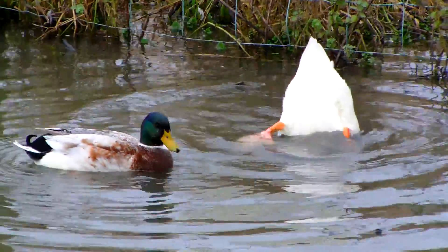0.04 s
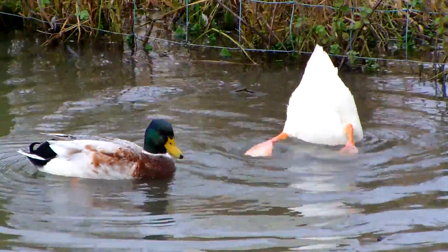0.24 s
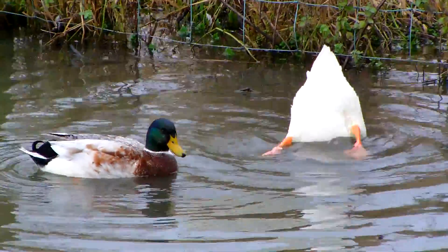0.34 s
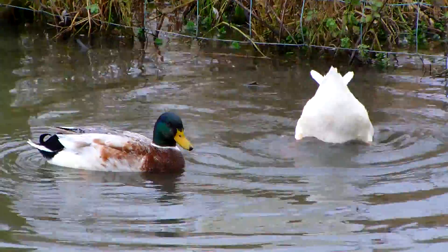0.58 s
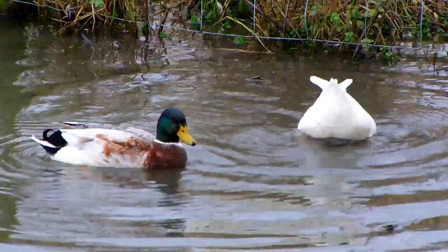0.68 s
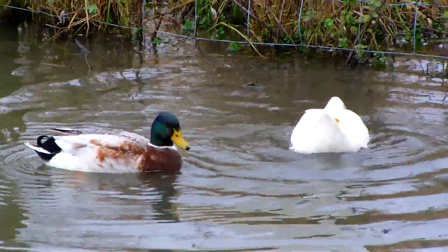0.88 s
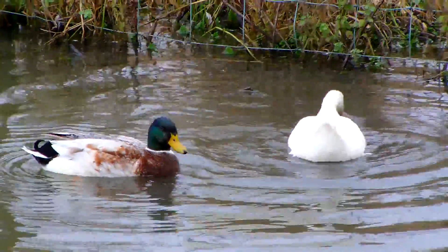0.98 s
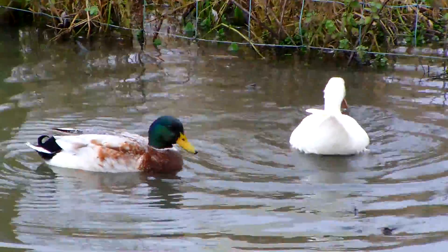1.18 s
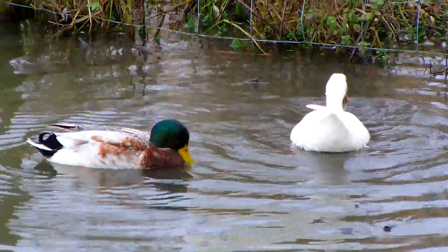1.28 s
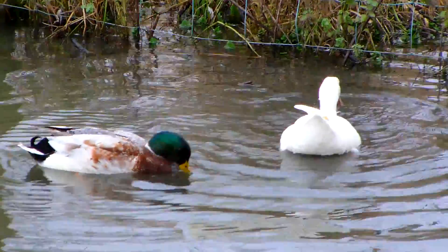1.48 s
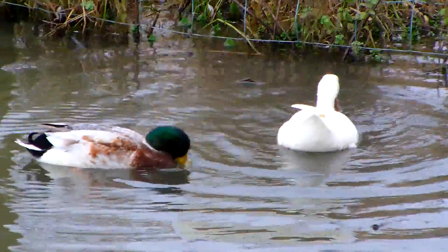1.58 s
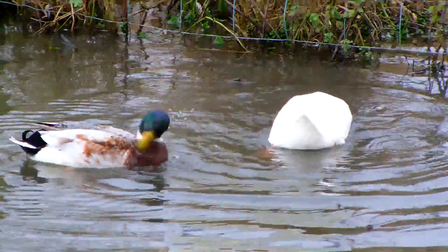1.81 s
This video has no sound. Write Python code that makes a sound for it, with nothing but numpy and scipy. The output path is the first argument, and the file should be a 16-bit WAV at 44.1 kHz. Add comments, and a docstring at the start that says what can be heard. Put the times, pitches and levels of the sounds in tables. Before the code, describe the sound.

On an open pond, one fluttering, raspy quack rings out near the start and fades quickly; gentle water swishes, ticking drops and very faint bubble and bird notes follow, with constant light hiss and low microphone rumble.

```python
"""Dabbling ducks swish a pond, over a light wind that hisses and rumbles throughout: all shaped noise.
Soon a duck gives one harsh, high, falling quack, made of fluttering harmonics, rasp and a shrill overtone.
The bank throws back a short echo with a tail of fading noise. Then come more swishes, sprays of tiny bursts,
with ticking drops of noise and the faint, wavering tones of bubbles and far birds. One microphone hears it all."""
import sys
import numpy as np
from scipy import signal
from scipy.fft import rfft
from scipy.io import wavfile
from scipy.ndimage import map_coordinates

SR = 44100
rng = np.random.default_rng(int(sys.argv[2]) if len(sys.argv) > 2 else 0)


def to_wav(s):
    """Save 16-bit WAV."""
    ch = np.atleast_2d(s).T  # columns
    pcm = np.round(np.clip(ch, -1, 1) * 32767)  # PCM
    wavfile.write(sys.argv[1], SR, pcm.astype(np.int16))


N = 81585  # length in samples, 1.85 s

# course of the quack, before the flutter acts on it:
# (time [s], pitch [Hz], flutter depth [share of pitch], level [dB], roughness [0-1])
QUACK_COURSE = [(.242, 690, .02, -52, .25), (.2465, 900, .05, -39.5, .13), (.257, 922, .08, -39, .1),
                (.278, 910, .085, -36.3, .18), (.305, 876, .072, -38.5, .24), (.335, 860, .06, -38.5, .24),
                (.351, 848, .058, -40, .25), (.365, 840, .055, -35.3, .13), (.378, 832, .052, -39, .24),
                (.394, 808, .05, -39.3, .25), (.412, 740, .01, -39.3, .3), (.436, 690, .005, -39, .3),
                (.444, 660, .005, -44, .35), (.449, 635, .005, -54, .4), (.46, 590, .005, -60, .4)]
# how strongly the throat passes each frequency: (frequency [Hz], gain [dB])
THROAT_CURVE = [(400, 23), (680, -6), (900, -4.5), (1150, -0.5), (1400, 1.5), (1700, -1), (2000, 2.5),
                (2400, 4.5), (2850, -10.5), (3350, -3), (3850, -6), (4300, -17.5), (4900, -5), (5250, -7.5),
                (5650, -5.5), (6200, -17.5), (6800, -14.5), (7600, -8), (8500, -29), (10500, -25.5),
                (15500, -32)]
# colour of the rasping air: (frequency [Hz], gain [dB])
RASP_CURVE = [(120, -18), (300, -13), (700, -14), (1100, -34), (1600, -32), (2500, -19), (3400, -3),
              (4300, -4.5), (5500, -21), (6300, 1), (7700, -2.5), (9000, 2), (11000, -17), (15500, -12)]
# the shrill overtone, which steps down from flutter to flutter:
# (time [s], frequency [Hz], level against the voice [dB])
SHRILL_COURSE = [(.255, 10850, -38), (.273, 10820, -21), (.286, 10700, -34), (.298, 9780, -16),
                 (.312, 9750, -12), (.321, 9400, -19), (.328, 8950, -9), (.346, 8950, -10),
                 (.362, 8800, -6), (.392, 8850, -7), (.415, 8830, -10), (.44, 8780, -16)]
# colour of the fizz around the shrill overtone: (frequency [Hz], gain [dB])
FIZZ_CURVE = [(6000, -22.5), (8000, -5), (9500, 6), (10300, -23), (12000, -25), (13800, -13), (15500, -30)]
# colour of the echo and its tail: (frequency [Hz], gain [dB])
BANK_CURVE = [(300, -8), (800, -4), (1400, 0), (1800, -2), (2250, 4), (3200, -7), (6000, -9), (9000, -10),
              (15000, -14)]
# swishes of dabbling: (start [s], rise [s], hold [s], fade [s], level [dB], colour tilt [dB per octave])
SWISH_EVENTS = [(-.03, 0.024, 0.015, 0.097, -59, 1.5), (0.102, 0.028, 0.096, 0.042, -55, -1.5),
                (0.588, 0.038, 0.058, 0.18, -57.5, -4), (0.77, 0.012, 0.01, 0.037, -78, 4),
                (0.84, 0.013, 0.016, 0.088, -62.5, -7), (0.957, 0.023, 0.071, 0.19, -59, -4.5),
                (1.28, 0.12, 0.033, 0.11, -53, 0), (1.778, 0.05, .08, .1, -59, -3.5)]
# colour of stirred water before the tilt: (frequency [Hz], gain [dB])
SWISH_CURVE = [(300, -40), (700, -11.5), (1400, -8.5), (2300, 4), (3200, 4), (4500, 2.5), (6000, -1.5),
               (8200, 1.5), (10500, -10.5), (15500, -42)]
# drops that slap the water: (start [s], level [dB], ring [Hz])
DROP_EVENTS = [(0.861, -50.5, 6400), (0.879, -53, 6300), (.932, -54.5, 7900), (1.347, -55, 8500),
               (1.382, -53, 3120), (1.47, -54, 4870), (1.762, -53, 2230)]
# notes of bubbles and far birds: (start [s], length [s], pitch [Hz], arch [share of pitch], level [dB])
FAINT_NOTES = [(.61, .17, 3300, .015, -69), (.735, .10, 745, .09, -66), (.84, .16, 815, .04, -68),
               (.96, .16, 785, .02, -67), (1.19, .08, 595, .02, -72), (1.33, .04, 1080, .02, -65),
               (1.345, .025, 3150, .02, -61), (1.378, .028, 3170, .01, -57), (1.47, .15, 3880, .03, -68),
               (1.75, .077, 3920, .045, -64)]
# colour of the hiss of plants and ripples: (frequency [Hz], gain [dB])
HISS_CURVE = [(59, -7), (100, -13), (306, -15), (420, -10.5), (589, -4), (668, -5), (742, -2), (898, -7),
              (1040, -4), (1260, -3.5), (1660, -5.5), (1920, -1.5), (2320, -0.5), (2630, -6.5), (2810, -3),
              (3850, -8), (4280, -7), (4660, -6.5), (7560, -3.5), (11100, -17), (15500, -16.5)]
# colour of the low buffeting at the microphone: (frequency [Hz], gain [dB])
RUMBLE_CURVE = [(10, -3), (28, -9), (55, -19), (110, -23.5), (250, -47), (600, -82)]

FLUTTER_HZ, FLUTTER_CREST_S = 33.7, .2565  # flutters per second, time of one pitch crest
FLUTTER_SQUARE = 1.7  # the syrinx (the bird's voice organ) lingers on its low and high pitch
CREST_DIP_DB, CREST_DULL_DB, CREST_ROUGH = 1.7, 3.0, .5  # a crest is weaker, duller and rougher
JITTER, TIMING_RAD = 0.035, 0.16  # wander of pitch [share] and of phase, at roughness 1
SHIMMER_DB, UPPER_SHIMMER_DB = 2.13, 1.5  # the upper harmonics sputter more
RASP_DB = -1.5  # against the voice, at roughness 1
THROAT_SAG = 0.072  # the throat resonances sink by this share for each octave that the pitch falls
SHRILL_WIDTH_HZ, SHRILL_GRAIN, SHRILL_WOBBLE = 650, .5, .003  # grain speed and depth, pitch wander [share]
SHRILL_DIP_DB, FIZZ_DIP_DB = 4, 5  # drop at the deepest pitch crest
FIZZ_DB = -9  # against the shrill overtone's level
ECHO_S, ECHO_DB = .036, -15
BANK_T60_S, BANK_DB = 0.46, -14.5  # time for the tail to fade by 60 dB, level of the tail
SPRAY_PER_S, SPRAY_SPREAD_DB = 16000, 1.5
SPATTER_DB, SPATTER_PER_S = .9, 70  # unevenness of a swish and its speed
DROP_DECAY_S, DROP_WIDTH_OCT = .004, .35
FAINT_WAVER, FAINT_FADING_DB = .007, 2  # wander of pitch [share] and of level
HISS_DB, HISS_FLICKER_DB = -57.5, 0.98
RUMBLE_DB = -69.5
NOTCH_HZ, NOTCH_WIDTH_HZ, NOTCH_DEPTH = 898, 112, 0.84  # a narrow band that the microphone barely hears
TOP_HZ = 15800  # the recorder cuts what lies above


def undb(db):
    """Decibels to gain."""
    return 10 ** (np.asarray(db) / 20)


def unit(x):
    """Scale to rms 1."""
    return x / np.sqrt(np.mean(x ** 2))


def response(hz, points):
    """Gain of a (frequency [Hz], gain [dB]) curve at the given frequencies."""
    f, db = np.array(points).T
    return undb(np.interp(np.log(hz + 1e-9), np.log(f), db))


def colour(x, points, tilt_db=0):
    """Filter by a (frequency [Hz], gain [dB]) curve, tilted per octave; rms 1."""
    hz = np.arange(len(x) // 2 + 1) * SR / len(x)
    gain = response(hz, points) * undb(tilt_db * np.log2(hz + 1))
    return unit(np.fft.irfft(rfft(x) * gain, len(x)))


def noise():
    """White noise, as long as the scene."""
    return rng.standard_normal(N)


def walk(rate):
    """Smooth random wander, spread near 1, through this many random values per second."""
    values = rng.standard_normal(N // 8)
    return map_coordinates(values, [np.arange(N) / SR * rate], order=3, mode="wrap")


def quack(t):
    """Harmonics of the fluttering syrinx through the throat, a rasp of air once a cycle and a shrill overtone."""
    when, *columns = np.array(QUACK_COURSE).T
    pitch, depth, db, rough = (np.interp(t, when, c) for c in columns)
    swing = np.cos(2 * np.pi * FLUTTER_HZ * (t - FLUTTER_CREST_S))
    flutter = np.tanh(FLUTTER_SQUARE * swing) / np.tanh(FLUTTER_SQUARE)
    crest = flutter * depth / depth.max()  # positive at high pitch, negative at low
    rough = rough * np.exp(CREST_ROUGH * crest)
    hz = pitch * (1 + depth * flutter) * (1 + JITTER * rough * walk(500))
    phase = 2 * np.pi * np.cumsum(hz) / SR + TIMING_RAD * rough * walk(1100)
    sag = 1 - THROAT_SAG * np.log2(pitch / np.median(columns[0]))

    voice, power = 0, 0
    for k in np.arange(1, int(TOP_HZ / pitch.min()) + 1):
        dulling = undb(-CREST_DULL_DB * crest * np.clip(k - 4, 0, 1))  # from the fifth harmonic up
        gain = response(k * hz * sag, THROAT_CURVE) * dulling * (k * hz < TOP_HZ)
        shimmer_db = SHIMMER_DB * walk(169.6) * min(k / 4, 1) + UPPER_SHIMMER_DB * walk(600) * (k > 4)
        harmonic = np.cos(k * phase + rng.uniform(0, 2 * np.pi))
        voice = voice + gain * undb(shimmer_db) * harmonic
        power = power + gain ** 2 / 2
    voice = voice / np.sqrt(power)  # so that the level follows the table, not the throat

    rasp = colour(noise() * (1 + np.cos(phase)) ** 2, RASP_CURVE)
    call = voice + undb(RASP_DB) * rough * rasp + shrill(t, crest)
    sounding = (t > when[0]) & (t < when[-1])
    return call * undb(db - CREST_DIP_DB * crest) * sounding


def shrill(t, crest):
    """A grainy high overtone wrapped in fizz; it sinks as the bill opens and flares between pitch crests."""
    when, *columns = np.array(SHRILL_COURSE).T
    hz, db = (np.interp(t, when, c) for c in columns)
    # a random complex strength blurs the pure tone into a band
    grain = 1 + SHRILL_GRAIN * (walk(SHRILL_WIDTH_HZ) + 1j * walk(SHRILL_WIDTH_HZ))
    phase = 2 * np.pi * np.cumsum(hz * (1 + SHRILL_WOBBLE * walk(259.5))) / SR
    tone = np.real(grain * np.exp(1j * phase))
    fizz = colour(noise(), FIZZ_CURVE)
    return undb(db - SHRILL_DIP_DB * crest) * tone + undb(db + FIZZ_DB - FIZZ_DIP_DB * crest) * fizz


def bank(x, t):
    """One echo off the bank and a short scattered tail from its plants."""
    fading = undb(-60 * t / BANK_T60_S) * (1 - np.exp(-t / 0.004))  # a quick build-up, then a fade
    tail = colour(noise() * fading, BANK_CURVE) / np.sqrt(N)
    scattered = signal.fftconvolve(x, tail[:N // 2])[:N]
    coloured = colour(x, BANK_CURVE) * np.std(x)  # back to the loudness of the call
    echo = np.interp(t - ECHO_S, t, coloured)
    return undb(BANK_DB) * scattered + undb(ECHO_DB) * echo


def swishes(t):
    """Stirred water: a dense spray of tiny bursts that swells and dies away."""
    out = 0
    for start, rise, hold, fade, db, tilt_db in SWISH_EVENTS:
        bursts = (rng.random(N) < SPRAY_PER_S / SR) * rng.standard_normal(N)
        spray = bursts * undb(SPRAY_SPREAD_DB * np.minimum(rng.exponential(size=N), 4))
        shape = np.interp(t, start + np.cumsum([0, rise, hold, fade]), [0, 1, 1, 0])
        level = undb(db + SPATTER_DB * walk(SPATTER_PER_S))
        out = out + level * shape * colour(spray, SWISH_CURVE, tilt_db)
    return out


def drops(t):
    """Each drop is a short, broadly tuned tick of noise that dies away fast."""
    out = 0
    for start, db, hz in DROP_EVENTS:
        width = 2 ** DROP_WIDTH_OCT
        ring = [(hz / 8, -26), (hz / width, -10), (hz, 0), (hz * width, -10), (hz * 4, -35)]
        fading = (t > start) * np.exp(-abs(t - start) / DROP_DECAY_S)
        out = out + undb(db) * colour(noise(), ring) * fading
    return out


def faint_notes(t):
    """Arched whistles and hoots of far birds and the blips of bubbles, all wavering a little."""
    out = 0
    for start, length, hz, arch, db in FAINT_NOTES:
        bow = np.sin(np.pi * np.clip((t - start) / length, 0, 1))  # up and down once
        pitch = hz * (1 + arch * bow + FAINT_WAVER * walk(60))
        tone = np.sin(2 * np.pi * np.cumsum(pitch) / SR)
        out = out + undb(db + FAINT_FADING_DB * walk(49.77)) * np.sqrt(2 * abs(bow)) * tone
    return out


def wind():
    """Even hiss of plants and ripples, and low buffeting at the microphone."""
    hiss = colour(noise(), HISS_CURVE) * undb(HISS_DB + HISS_FLICKER_DB * walk(40.24))
    rumble = colour(noise(), RUMBLE_CURVE) * undb(RUMBLE_DB + walk(28))
    return hiss + rumble


def scene():
    """All sources, the same in both channels; the bank answers the quack and the faint notes."""
    t = np.arange(N) / SR
    calls = quack(t) + faint_notes(t)
    mono = calls + bank(calls, t) + swishes(t) + drops(t) + wind()
    return np.array([mono, mono])


def record(dry):
    """The microphone has a narrow notch; the recorder cuts the top."""
    b, a = signal.iirpeak(NOTCH_HZ, NOTCH_HZ / NOTCH_WIDTH_HZ, fs=SR)
    heard = dry - NOTCH_DEPTH * signal.lfilter(b, a, dry)
    top_cut = signal.ellip(10, .2, 70, TOP_HZ, fs=SR, output="sos")
    return signal.sosfilt(top_cut, heard)


dry = scene()
out = record(dry)
to_wav(out)
```